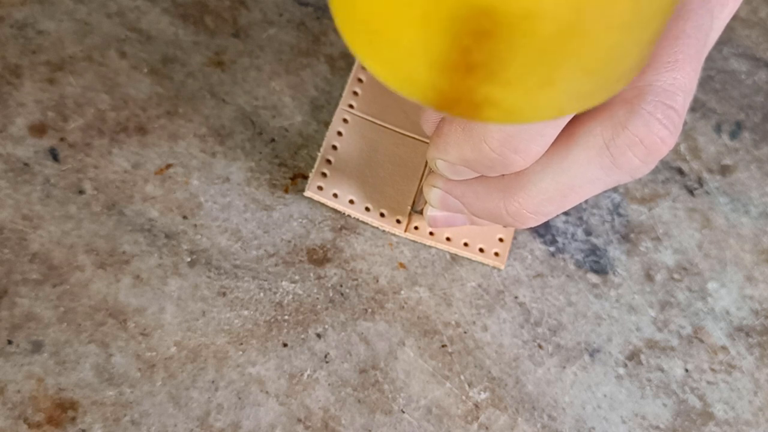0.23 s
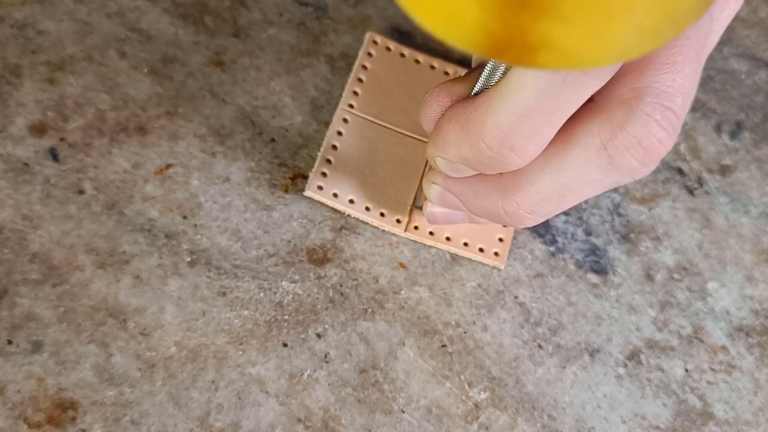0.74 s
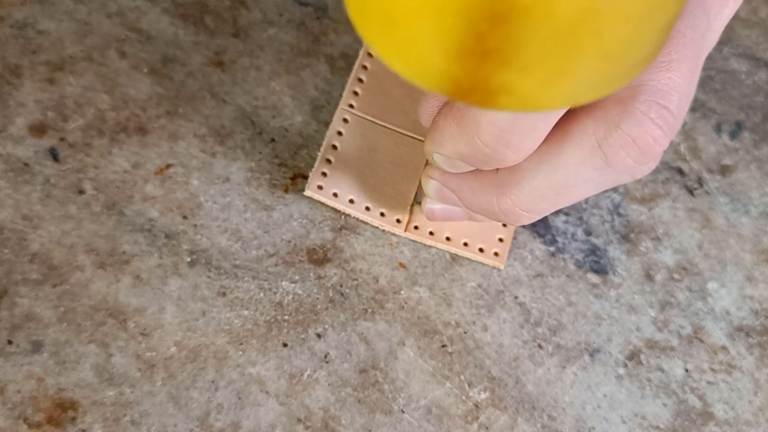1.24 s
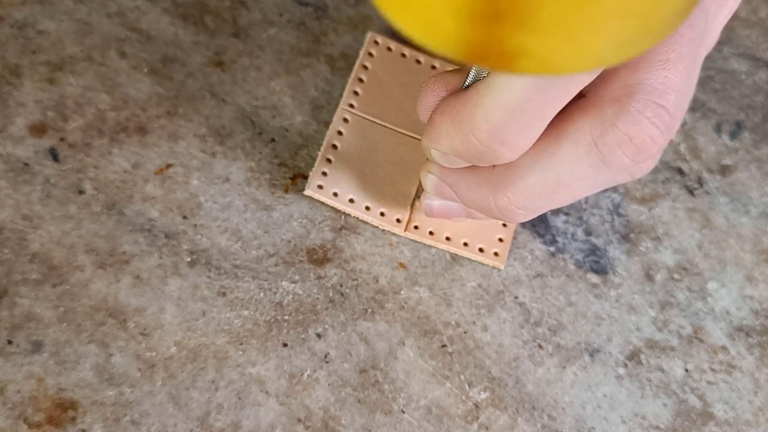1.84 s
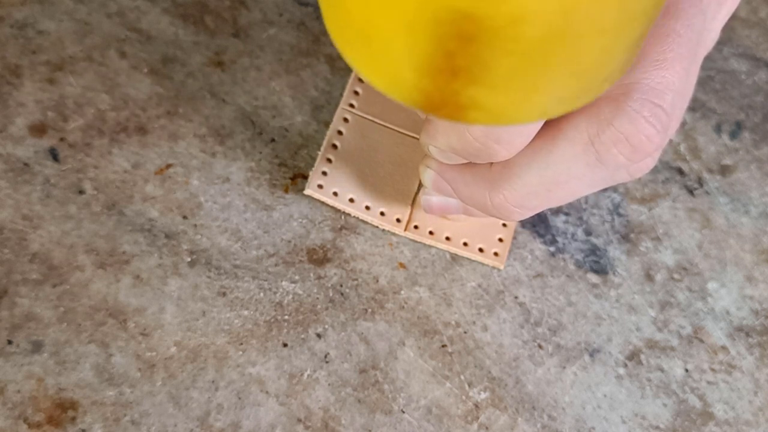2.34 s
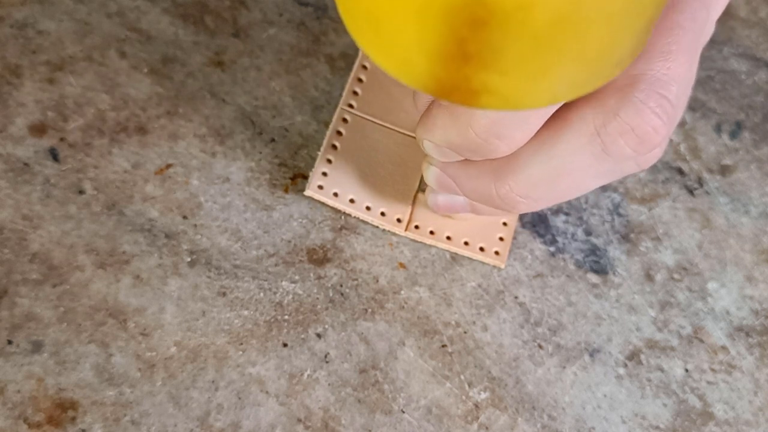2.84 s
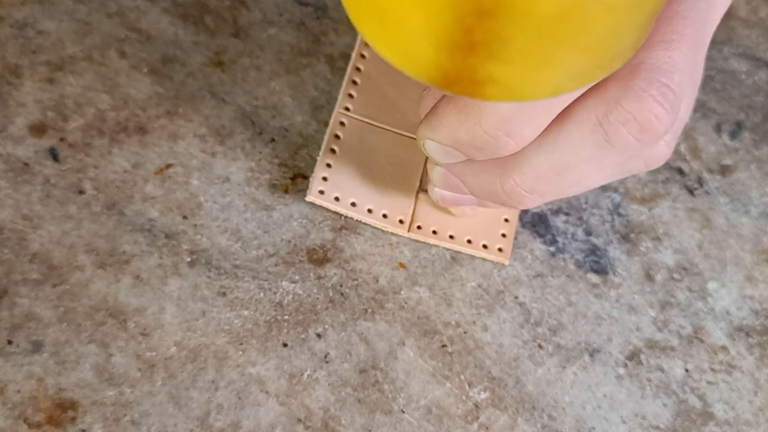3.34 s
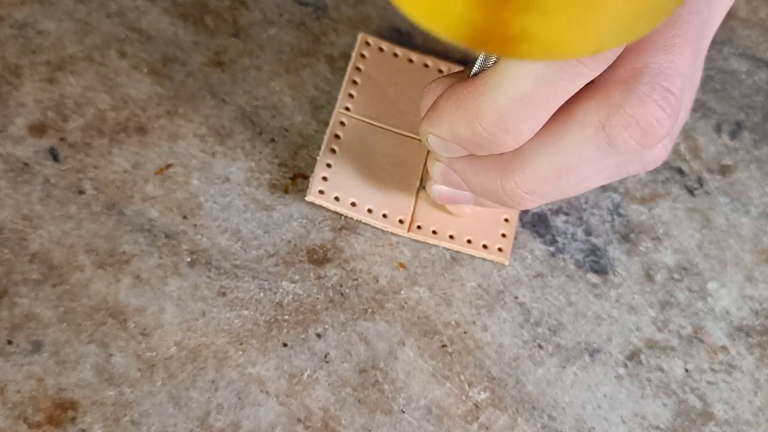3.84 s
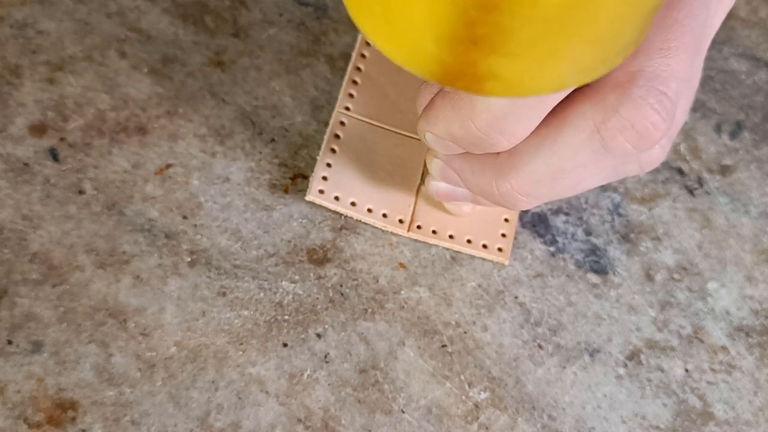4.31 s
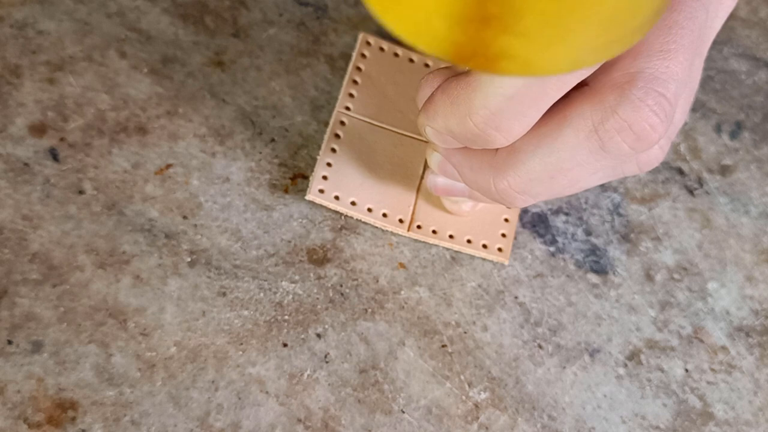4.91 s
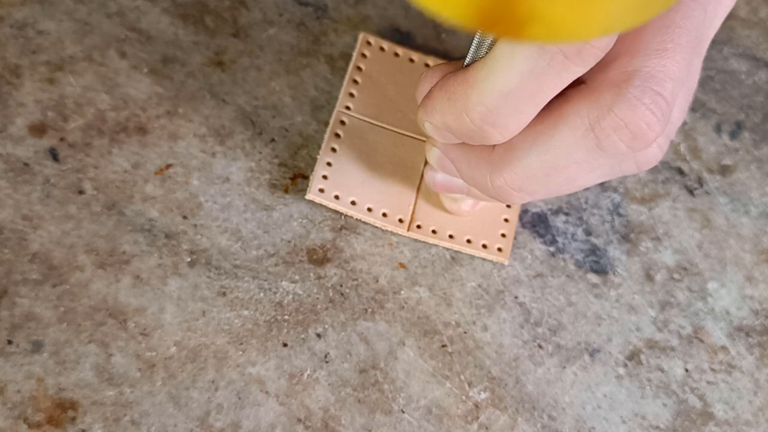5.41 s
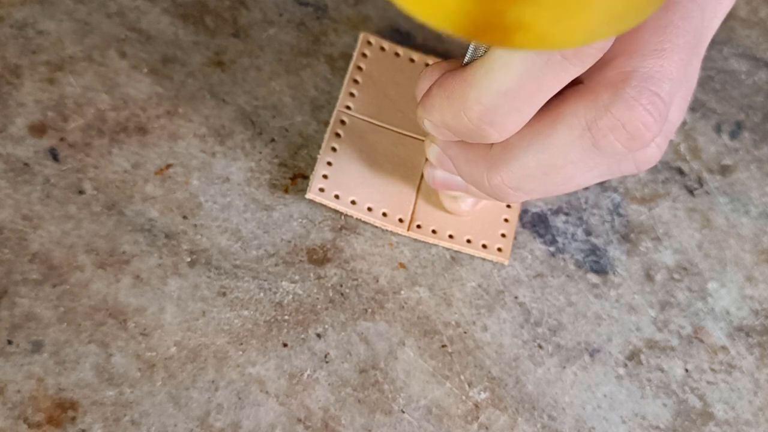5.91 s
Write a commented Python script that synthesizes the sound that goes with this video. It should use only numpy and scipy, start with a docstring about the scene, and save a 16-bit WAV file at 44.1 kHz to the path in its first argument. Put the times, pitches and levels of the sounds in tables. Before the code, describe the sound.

A mallet taps a steel stamping tool into leather on a stone slab, about five blows a second. Each blow is a sharp knock with a metallic tick, a dull thud from the slab and a faint ring from the bench. The first run stops near the middle; after a brief pause a second starts softly and grows harder. The sound is close, with short, bright echoes and a low boom from a small, quiet room.

```python
"""A mallet taps a steel stamping tool into leather on a stone slab: two runs of about five blows a second.
Each blow is a double knock: the head meets the tool, then the tool bottoms out, sooner as the leather
packs down. The slab thuds, the bench rings faintly, and a small room answers with a bright wash and
a low boom. A quiet hush lies underneath, and noise suppression cuts the tails short."""
import sys
import numpy as np
from scipy import signal
from scipy.fft import rfft, irfft
from scipy.io import wavfile
from scipy.ndimage import uniform_filter1d

SR = 44100
rng = np.random.default_rng(int(sys.argv[2]) if len(sys.argv) > 2 else 0)


def wav_record(signal):
    """Record a signal, one row per channel, as 16-bit PCM in the file named by sys.argv[1]."""
    frames = np.transpose(np.atleast_2d(signal))
    bounded = np.clip(frames, -1, 1)
    # unit amplitude maps onto the largest positive 16-bit level
    quanta = np.round(bounded * 32767).astype(np.int16)
    wavfile.write(sys.argv[1], SR, quanta)


N = 271656
SIZE, LEAD = 16384, 128  # samples: one blow's length, the run-in before its onset
HZ = np.fft.rfftfreq(SIZE, 1 / SR)
T = np.arange(SIZE) / SR


def gain_of(db):
    """Decibels to amplitude."""
    return 10 ** (np.asarray(db) / 20)


def eq_curve(points, hz):
    """Each level column of a spectrum table, joined on a log-frequency axis."""
    point_hz, *columns = np.transpose(points)
    return np.array([np.interp(np.log(hz + 1), np.log(point_hz), db) for db in columns])


def minimum_phase(db):
    """The response with this gain that starts at once and dies soonest."""
    log_gain = np.log(gain_of(np.concatenate([db, db[:, -2:0:-1]], axis=1)))
    return np.exp(np.conj(signal.hilbert(log_gain)))[:, :len(HZ)]


def delay(seconds):
    """A delay, as a spectrum."""
    return np.exp(-2j * np.pi * HZ * seconds)


def place(mix, onset_s, spectrum):
    """Mixes in a blow's spectrum as sound, keeping the run-in before its onset."""
    sound = irfft(spectrum * delay(LEAD / SR))
    at = round(onset_s * SR) - LEAD
    part = mix[:, max(at, 0):max(at + SIZE, 0)]
    part += sound[:, max(-at, 0):][:, :part.shape[1]]


def groove(onset_s, strength_db, pack_ms_per_s=.034, pack_ms_per_force=.085, wobble_ms=.084):
    """The gap between the knocks (ms) and the wobble (0-1) shrink as leather packs and the tool seats."""
    # Runs along a groove. Each row: start in seconds, base gap on fresh leather in ms,
    # seconds the tool takes to seat.
    runs = [(0., .745, 1.03), (3.58, .73, .39)]
    start_s, fresh_ms, seat_s = ([run for run in runs if run[0] <= onset_s] or runs)[-1]
    age_s = max(onset_s - start_s, 0)
    shake = min(gain_of(strength_db + 3), 1)  # a tap under -3 dB shakes the tool less
    wobble = shake / (1 + (age_s / seat_s) ** 6)
    packed_ms = fresh_ms - pack_ms_per_s * age_s - pack_ms_per_force * (gain_of(strength_db) - 1)
    return packed_ms + wobble_ms * wobble, wobble


def double_knock(strength_db, tick_db, gap_ms, wobble, soft_hz=3700, tick_hz=6300, air_hz=12500):
    """The soft head lands first; the hard stop on the slab follows and carries the treble."""
    force = gain_of(strength_db)
    second_db = 2.3 - 5.5 * force ** 2  # a harder blow spends more of itself in the first knock
    soft = 1 / (1 + (HZ / soft_hz) ** 4)
    stop = delay(gap_ms / 1000)
    lows = soft * (1 + gain_of(second_db) * stop)
    highs = (1 - soft) * (stop + .47 * wobble)  # a loose tool clicks both times
    tilt_db_per_octave = -2.5 + 5.7 * (force - 1) + 3.5 * wobble
    bright_db = tilt_db_per_octave * np.log2(1 + (HZ / 2000) ** 2) / 2
    shelf_db = tick_db * HZ ** 4 / (HZ ** 4 + tick_hz ** 4)
    return (lows + highs) * gain_of(bright_db + shelf_db + .22 * wobble) / (1 + (HZ / air_hz) ** 8)


def grip(above_hz=3000):
    """The fingers damp the tool's upper resonances a little differently on each blow."""
    knots_hz = np.linspace(0, SR / 2, num=32)
    ripple_db = 1.8 * np.interp(HZ, knots_hz, rng.standard_normal(len(knots_hz)))
    return minimum_phase((ripple_db * HZ ** 2 / (HZ ** 2 + above_hz ** 2))[None])


def steel_tool(level_db=-1.15, hold_hz=1900, hold_q=.44, right_lag_ms=.14):
    """The direct knock: the steel shaft holds it for a fraction of a millisecond, then lets go."""
    # The knock's tone. Each row: frequency in Hz, relative left and right levels in dB.
    tone = [(51, -36.5, -22.5), (788.4, 3, -10), (1123, 5.5, 5), (1690, 10, -10.5), (2044, 12.5, -0.5),
            (2390, -4, -28.5), (2892, 7.5, 4), (3180, -4.5, -17), (4930, -12.5, -12), (5684, -10.5, -14.5),
            (7440, -43.5, -15.5), (8240, -3.5, -1.5), (10300, -8.5, -49.5), (10470, -20.5, -45.5)]
    detune = hold_q * ((HZ + 1) / hold_hz - hold_hz / (HZ + 1))
    all_pass = (1 - 1j * detune) / (1 + 1j * detune)
    arrival = np.array([delay(0), delay(right_lag_ms / 1000)])
    return gain_of(level_db) * all_pass * minimum_phase(eq_curve(tone, HZ)) * arrival


def slab_thud(right_db=-4):
    """The slab heaves for a cycle or two under the blow."""
    # Damped modes of slab and bench. Each row: frequency in Hz, level in dB, seconds to the crest.
    modes = [(196.7, -29, 0.0028), (470, -34.5, 0.0024)]
    heave = sum(gain_of(db) * T / crest * np.exp(1 - T / crest) * np.cos(2 * np.pi * hz * T)
                for hz, db, crest in modes)
    return rfft(heave * gain_of([[0], [right_db]]))


def heft(strength_db):
    """A harder blow is also shorter, so the upper bass grows faster than the deep bass."""
    octaves = np.log2(np.clip(HZ, 90, 450) / 200)
    return gain_of(strength_db * (1.5 + .53 * octaves))


def ring(modes, build_s):
    """The spectrum of dying modes that swell during the build time."""
    waves = sum(np.sign(polarity) * gain_of(db - 60 * T / t60) * np.sin(2 * np.pi * hz * T)
                for hz, db, t60, polarity in modes)
    return rfft(waves * (1 - np.exp(-(T / build_s) ** 2)))


def bench_rings(left_db=1.5, right_db=-1.5):
    """The bench and the things on it ring faintly after a blow."""
    # Their modes. Each row: frequency in Hz, relative level in dB, t60 in seconds, polarity.
    modes = [(53, -63, 1, 1), (494, -48, .16, -1), (528, -64, .38, 1), (940, -54, .1, 1),
             (1176, -47.5, .13, -1), (1275, -56, .14, 1), (1420, -53, .11, -1), (1519, -53, .32, 1),
             (1610, -44, .11, -1), (1698, -51, .19, -1), (1953, -47.5, .16, 1), (3010, -60, .1, 1),
             (3088, -58, .15, -1)]
    return ring(modes, build_s=.0072) * gain_of([[left_db], [right_db]])


def bench_rumble(level_db=-63.5, below_hz=45, t60=.54, attack_s=.0067):
    """The bench shudders for a moment, never quite the same way twice."""
    shake = irfft(rfft(rng.standard_normal((2, SIZE))) / (1 + (HZ / below_hz) ** 4))
    envelope = gain_of(level_db - 60 * T / t60) * (1 - np.exp(-T / attack_s))
    return rfft(envelope * shake / shake.std())


def reflections(t60=.43, fade_s=.14, wall_s=.0105, wall_width_s=.0022):
    """Dense echoes: a few from the bench, a cluster from the nearest wall, then an ever faster decay."""
    decay = gain_of(-60 * T / t60 - 9.1 * (T / fade_s) ** 3) * (T > .002)
    wall = 1 + 1.3 * np.exp(-((T - wall_s) / wall_width_s) ** 2)
    taps = rng.standard_normal((2, SIZE)) * (rng.random((2, SIZE)) < .3) * decay * wall
    return rfft(taps / np.linalg.norm(taps, axis=1, keepdims=True))


def room_wash(steady_echoes, level_db=-1.27, reshuffle_hz=7000):
    """The room throws the knock back; small moves of the hand reshuffle mainly the treble echoes."""
    # The reflected knock's tone. Each row: frequency in Hz, relative left and right levels in dB.
    tone = [(230, -9, -6), (388, 3, -6.5), (700, -2.5, -0.5), (1150, -4.5, -13.5), (1700, -3, -1),
            (2117, 1, -1), (2290, -15.5, -7), (2900, -6, -7.5), (3230, -14.5, -12), (3900, -14, -15.5),
            (5020, -25.5, -18.5), (6220, -20, -10.5), (6640, -39.5, -15.5), (8600, -11, -15.5),
            (11140, -28, -39)]
    fresh_share = HZ / (HZ + reshuffle_hz)
    echoes = np.sqrt(1 - fresh_share) * steady_echoes + np.sqrt(fresh_share) * reflections()
    return gain_of(level_db) * minimum_phase(eq_curve(tone, HZ)) * echoes


def shank(wobble, gap_ms, cycles_per_gap=1.92, width_hz=140, ring_db=7.0):
    """A tool not yet seated in its groove rings out into the room, higher as the gap closes."""
    ring_hz = cycles_per_gap * 1000 / gap_ms
    return minimum_phase(wobble * ring_db / (1 + ((HZ[None] - ring_hz) / width_hz) ** 2))


def room_boom(right_db=1):
    """The room's low modes swell after the blow, some in beating pairs."""
    # Room modes. Each row: frequency in Hz, relative level in dB, t60 in seconds, polarity.
    modes = [(109, -46, .48, -1), (112, -33, .28, -1), (126, -38, .28, -1), (131, -28, .21, -1),
             (143, -51, .33, 1), (163, -45, .28, 1), (171, -26, .1, -1), (177, -43, .27, 1),
             (187, -30, .19, -1), (189, -31, .22, 1), (201, -59, .5, -1), (208, -49, .42, 1),
             (226, -26, .13, 1), (265, -30, .12, 1), (288, -31, .1, -1), (323, -39, .15, -1),
             (346, -41, .19, 1), (377, -38, .17, -1)]
    return ring(modes, build_s=.042) * gain_of([[0], [right_db]])


def mallet():
    """Every blow drives the same tool, slab, bench and room."""
    # The blows. Each row: start in seconds, strength in dB, boost or cut of the steel's tick in dB.
    blows = [(-0.105, 3, -12.5), (0.0925, 2, -9), (0.2922, 2.02, -6.5), (0.4817, 1.08, -1.5),
             (0.6919, 1.58, -9.5), (0.9002, -1.25, 0.5), (1.0958, 0, -2.5), (1.2881, -1.07, 0.5),
             (1.4788, 0.24, -1.5), (1.6571, -0.64, 3), (1.8553, 1.2, 2), (2.0586, 1.5, -2.5),
             (2.2457, 2.2, -4), (2.4175, 1.9, -3.5), (2.628, 2.33, 1), (2.8084, 2.5, 2),
             (3.5844, -13, -3.5), (3.793, -3.5, 6), (3.9984, -1.22, -1), (4.1878, -1.25, -2),
             (4.383, -1.4, 7), (4.5874, -1.5, 1), (4.7687, -0.46, 1.5), (4.9641, 1.36, 3.5),
             (5.1646, 4, -4.5), (5.363, 3.5, -7), (5.5649, 4, -7), (5.7659, 4.5, -3), (5.972, 5, -2.5)]
    direct, rings, steady_echoes = steel_tool(), bench_rings(), reflections()
    body = slab_thud() + room_boom()
    mix = np.zeros((2, N))
    for onset_s, strength_db, tick_db in blows:
        gap_ms, wobble = groove(onset_s, strength_db)
        wash = room_wash(steady_echoes) * shank(wobble, gap_ms)
        knock = double_knock(strength_db, tick_db, gap_ms, wobble) * grip() * (direct + wash)
        bass = heft(strength_db) * (body + bench_rumble())
        place(mix, onset_s, gain_of(.98 * strength_db) * (knock + rings) + bass)
    return mix


def room_tone(level_db=-72, shared=.31):
    """A very quiet steady hush, partly common to left and right."""
    # The hush's spectrum. Each row: frequency in Hz, relative noise density in dB.
    tone = [(25, -17), (300, -10), (400, -11.5), (600, -19), (1100, -15.5), (3500, -27.5), (6000, -34.5),
            (10000, -31), (11300, -35.5), (16000, -37.5)]
    noise = rng.standard_normal((3, N))
    colour = gain_of(eq_curve(tone, np.fft.rfftfreq(N, 1 / SR)))
    hush = irfft(rfft(noise[:2] + shared * noise[2]) * colour, N)
    return gain_of(level_db) * hush / hush.mean(0).std()


def suppress_noise(sound, depth_db=8.5, threshold_db=8.0, knee_db=6.0):
    """Each band is turned down as it nears its own quietest level, which cuts the tails short."""
    bands = signal.stft(sound, nperseg=512, noverlap=384)[2]
    power = uniform_filter1d((abs(bands) ** 2).mean(0), size=7, axis=0)  # smooth across frequency
    power = uniform_filter1d(power, size=3, axis=1)  # and over time
    level_db = 10 * np.log10(abs(power) + 1e-20)
    floor_db = np.percentile(level_db, 10, axis=1, keepdims=True)
    shut = .5 + .5 * np.tanh((floor_db + threshold_db - level_db) / knee_db)
    return signal.istft(bands * gain_of(-depth_db * shut), nperseg=512, noverlap=384)[1][:, :N]


def scene():
    """The tapping over the room tone."""
    return mallet() + room_tone()


def record(dry):
    """Noise suppression, then a steep high cut at 16.4 kHz."""
    high_cut = signal.firwin(255, 16400, window=("kaiser", 9), fs=SR)
    return signal.oaconvolve(suppress_noise(dry), high_cut[None], "same")


dry = scene()
out = record(dry)
wav_record(out)
```